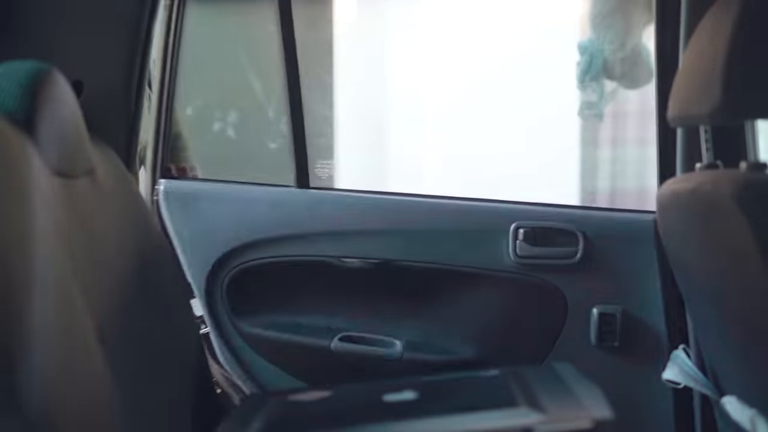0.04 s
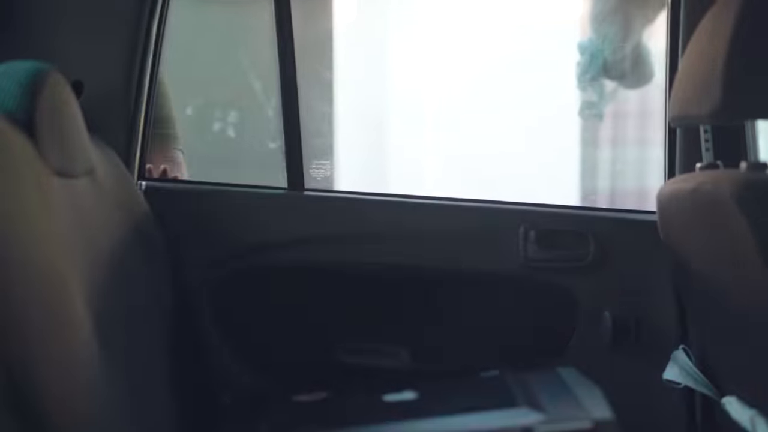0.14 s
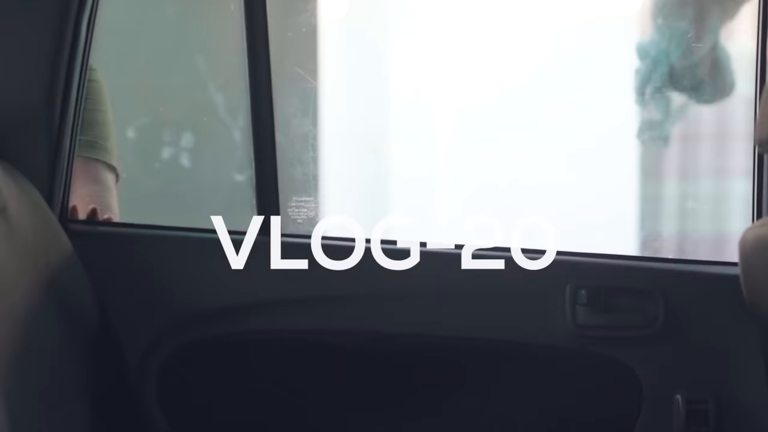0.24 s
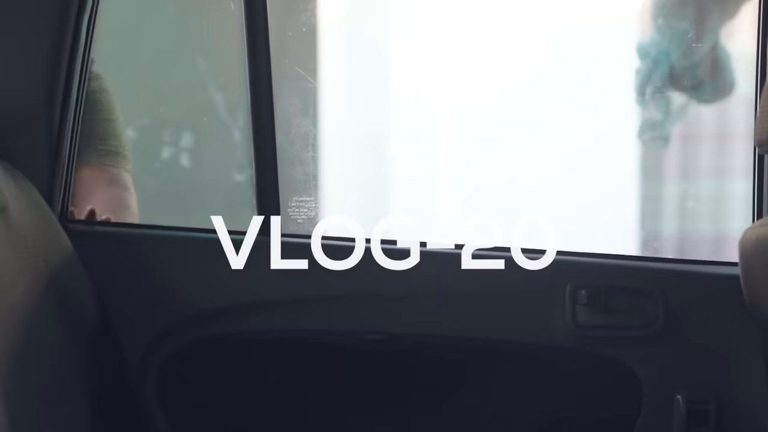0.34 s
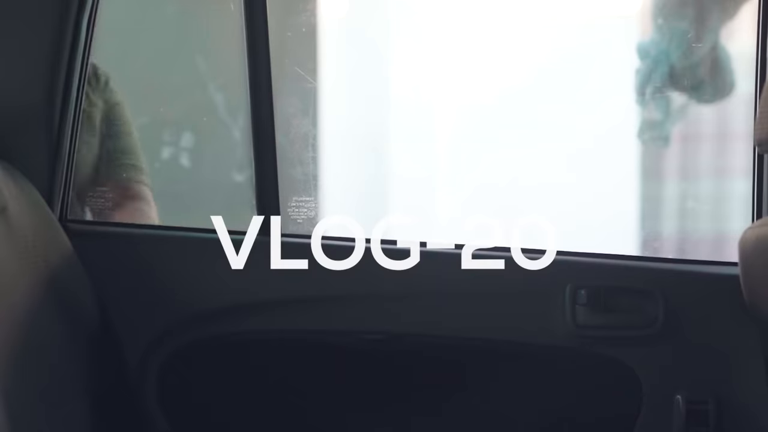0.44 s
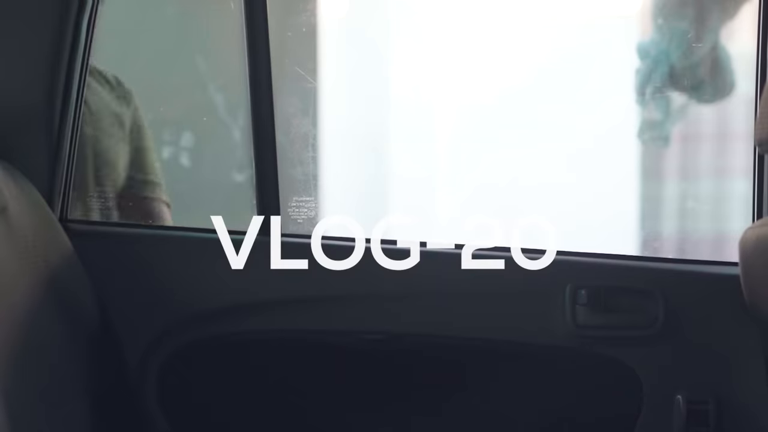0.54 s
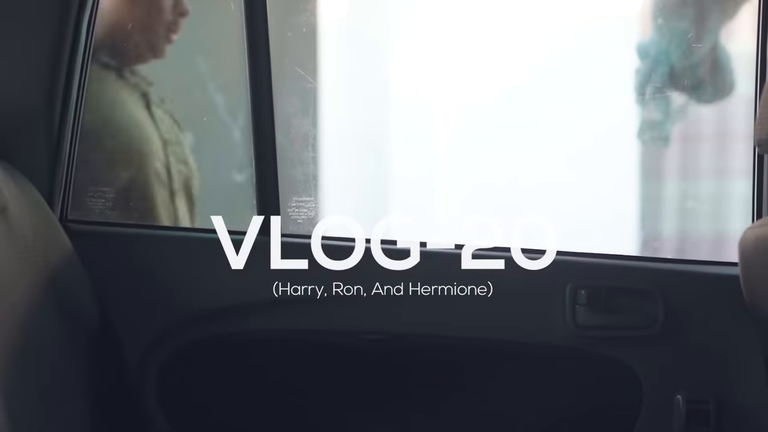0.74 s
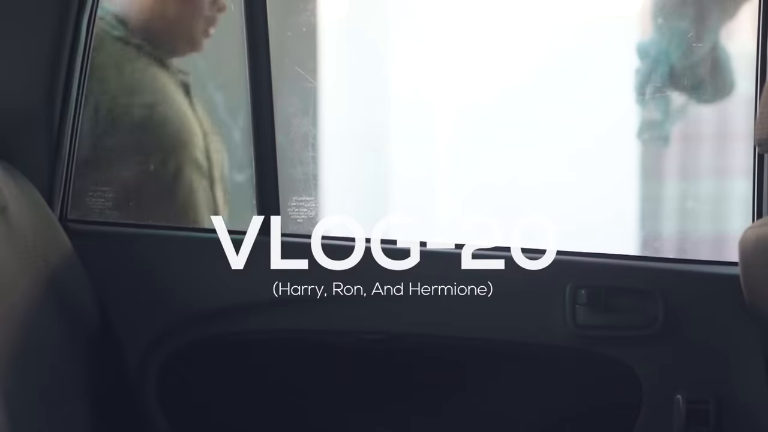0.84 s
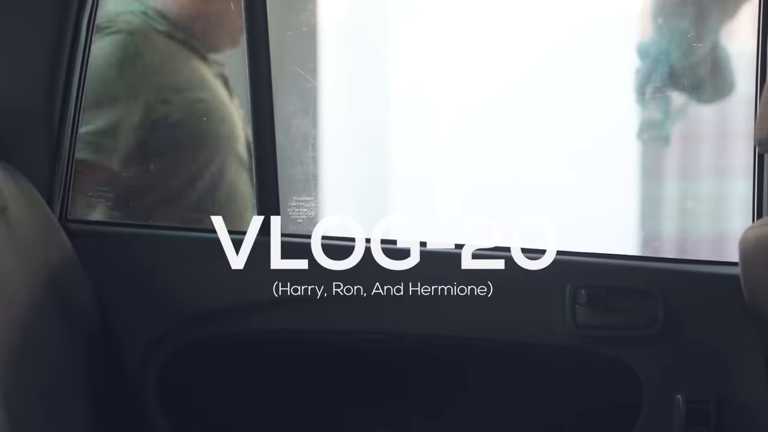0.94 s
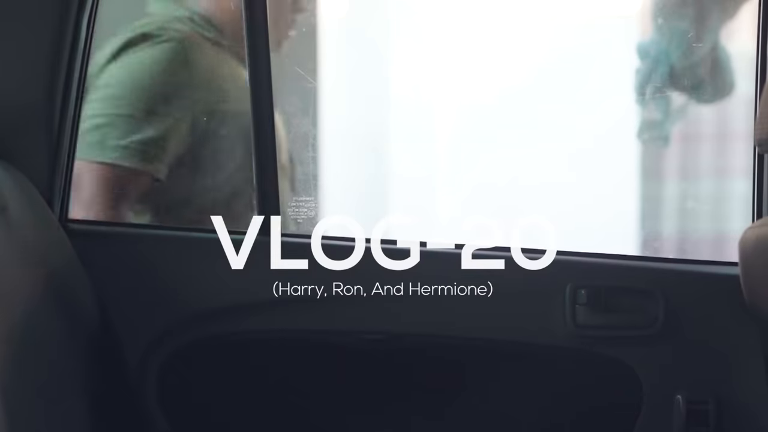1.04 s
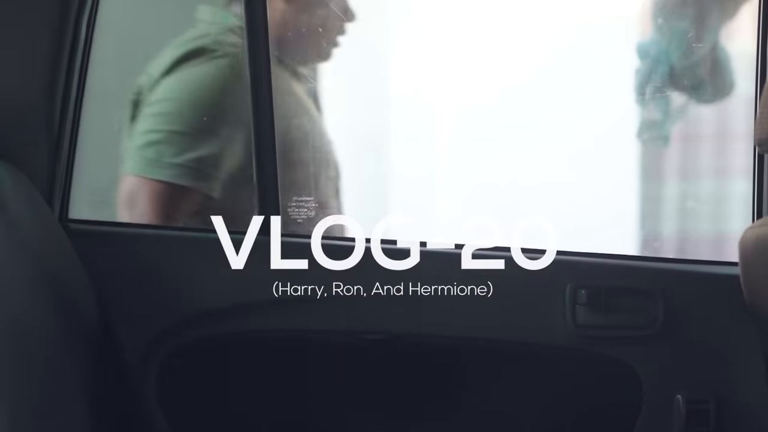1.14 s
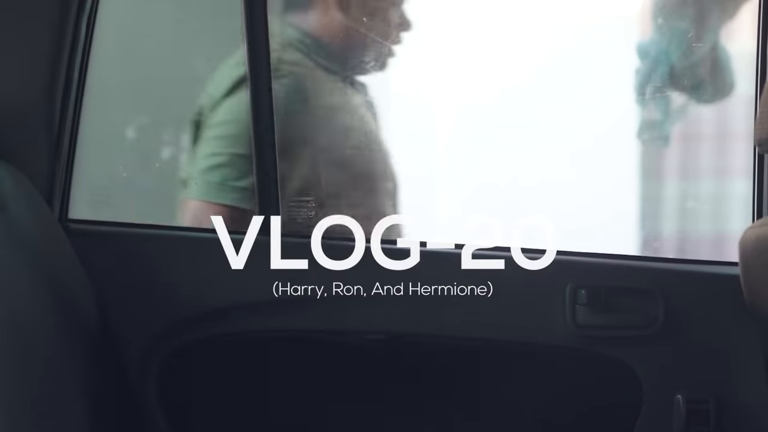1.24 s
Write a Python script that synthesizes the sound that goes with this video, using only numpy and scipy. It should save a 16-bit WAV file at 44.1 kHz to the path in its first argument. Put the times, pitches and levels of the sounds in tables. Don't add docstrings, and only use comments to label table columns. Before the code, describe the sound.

A car door shuts once, close, heard in stereo from inside the cabin: sharp latch click, deep boomy thud, brief trim and glass rattle, then yard echoes over faint traffic and a late bird whistle.

```python
import sys
import numpy as np
from scipy import signal
from scipy.fft import rfft, irfft
from scipy.io import wavfile
from scipy.ndimage import uniform_filter1d

SR = 44100
rng = np.random.default_rng(int(sys.argv[2]) if len(sys.argv) > 2 else 0)


def volts(x):
    e = np.asarray(x, float) / 20
    return 10 ** e


def waveform_to_disk(signal):
    frames = np.transpose(np.atleast_2d(signal))
    scaled = np.clip(frames, -1, 1) * 32767
    samples = np.round(scaled).astype(np.int16)
    wavfile.write(sys.argv[1], SR, samples)


N = 57330

# start in seconds, latch ring in dB, ping in Hz, ping in dB.
CONTACTS = [
    (.2305, -21, 8000, -27),
    (.2345, -8.5, 3670, -16.5),
    (.2487, -12.5, 870, -14),
    (.2515, -18, 7400, -19),
    (.257, -19, 7000, -37),
    (.265, -15, 1170, -19),
    (.2765, -34, 4170, -17),
    (.292, -40, 3540, -23),
    (.302, -15, 3985, -22),
]


def evened(x):
    return x / np.sqrt(np.mean(x ** 2) + 1e-20)


def read(points, hz):
    f, value = np.transpose(points)
    return np.interp(np.log(hz + 1), np.log(f + 1), value)


def add(mix, s, sound):
    part = mix[round(s * SR):][:len(sound)]
    part += sound[:len(part)]


def ring(modes):
    t = np.arange(SR // 2) / SR
    hz, db, t60 = np.transpose(modes)[:, :, None]
    phase = np.pi * np.arange(len(modes))[:, None]
    return volts(db - 60 * t / t60) * np.sin(2 * np.pi * hz * t + phase)


def paired(a, b):
    # frequency in Hz, left-right likeness from 0 to 1.
    likeness = [(50, 1), (125, 1), (250, 0.97), (600, 0.57), (1500, 0.76), (4000, 0.075), (15000, 0.0091)]
    same = np.clip(read(likeness, np.fft.rfftfreq(N, 1 / SR)), 0, 1)
    mid = np.sqrt((1 + same) / 2) * rfft(a, N)
    side = np.sqrt((1 - same) / 2) * rfft(b, N)
    return irfft([mid + side, mid - side], N)


def coloured(x, spectrum):
    return irfft(rfft(x, N) * volts(read(spectrum, np.fft.rfftfreq(N, 1 / SR))), N)


def narrow(hz, wide_hz):
    f = np.fft.rfftfreq(N, 1 / SR)
    resonance = 1 + (2 * (f - hz) / wide_hz) ** 2
    return evened(irfft(rfft(rng.standard_normal((2, N))) / resonance, N))


def street():
    # frequency in Hz, level in dB per Hz.
    traffic = [(25, -3), (60, -6), (130, 4), (300, -9), (1000, -13), (1500, -17), (6700, -32.5),
               (16000, -34)]
    # frequency in Hz, change in dB.
    door_loss = [(40, 3.5), (150, -5.5), (700, -3.5), (3000, -3), (12000, -5)]
    # pitch in Hz, level in dB, end in seconds.
    trill = [
        (5700, -55.5, 0.097),
        (6680, -55, 0.095),
    ]
    hum_db, tyres_db, shut_s = -42, -47.5, .24
    t = np.arange(N) / SR
    hum = volts(hum_db) * evened(coloured(paired(*rng.standard_normal((2, N))), traffic))
    hum = hum + volts(tyres_db) * paired(*narrow(hz=715, wide_hz=186))
    hum = np.where(t < shut_s, hum, coloured(hum, door_loss))
    for hz, db, end in trill:
        hum = hum + volts(db) * narrow(hz, 350) / (1 + np.exp((t - end) / 0.052))
    return hum


def latch():
    # frequency in Hz, level in dB, 60 dB decay in seconds.
    latch_modes = [(855, -20, 0.15), (1098, -3.5, 0.033), (1300, 0, 0.045), (2077, -6, 0.039),
                   (2642, -14, 0.075), (5300, -22, 0.027)]
    ping_t60_s, crack_db, crack_hz = 0.023, -16.5, 5730
    out = np.zeros(N)
    crack = rng.standard_normal((len(CONTACTS), 200)) * np.exp(-np.arange(200) / SR / 0.0021)
    crack = signal.lfilter(*signal.butter(1, crack_hz, fs=SR), crack)
    metal = ring(latch_modes).sum(0)
    for (s, db, ping_hz, ping_db), c in zip(CONTACTS, crack):
        ping = ring([(ping_hz, ping_db, ping_t60_s)])[0]
        add(out, s, volts(db - 5) * metal + ping)
        add(out, s, volts(ping_db + crack_db + 7.5) * c)
    return out


def rattle():
    # time in seconds, level in dB.
    shaking = [(0.231, -49.5), (0.23, -23), (0.247, -18.5), (0.25, -17.5), (0.302, -15), (0.34, -25.5),
               (.36, -21), (.47, -36), (.6, -52)]
    # frequency in Hz, level in dB per Hz.
    rattle_spectrum = [(35, -32), (60, -14.5), (256, -4.5), (398, -15), (540, -7), (607, -12.5),
                       (1510, -17), (6900, -32), (16000, -49)]
    knocks_per_s, spread_db = 3000, 2
    size = volts(spread_db * rng.exponential(1, (2, N))) * rng.standard_normal((2, N))
    knocks = size * (rng.random((2, N)) < knocks_per_s / SR)
    knocks += 0.32 * rng.standard_normal((2, N))
    level_db = np.interp(np.arange(N) / SR, *np.transpose(shaking))
    return evened(coloured(paired(*knocks), rattle_spectrum)) * volts(level_db)


def body():
    # start in seconds, level in dB, push length in seconds.
    blows = [
        (.249, -12, 0.0028),
        (.26, -9.5, 0.0032),
        (.277, -5.5, 0.00375),
        (.299, -6.5, 0.00383),
        (.317, -7, 0.0032),
        (.331, -10, 0.00362),
        (.352, -8.5, 0.0038),
        (.376, -16, 0.0041),
        (.395, -13.5, 0.0023),
        (.423, -19, 0.0038),
    ]
    # frequency in Hz, level in dB, 60 dB decay in seconds.
    shell_modes = [(62.8, -6, 0.17), (103.9, -15.5, 0.74), (124.3, -5.5, 0.51), (159.5, 2.5, 0.39),
                   (185.2, -0.5, 0.26), (198.9, -1.5, 0.81), (225.3, -12, 0.32), (252.9, -11, 1),
                   (315.1, 3, 0.24), (371, 4.5, 0.232), (425.7, 7, 0.18), (457, -28, .2), (550, -22, 0.18)]
    skew_db = 2.0
    push = np.zeros(N)
    for s, db, length in blows:
        shape = np.sin(np.pi * np.arange(0, length, 1 / SR) / length) ** 2
        add(push, s, volts(db - 9.5) * shape / shape.sum())
    skew = volts(skew_db * np.outer([-1, 1], rng.standard_normal(len(shell_modes))))
    return signal.fftconvolve(push[None], skew @ ring(shell_modes), axes=1)[:, :N]


def puff():
    start_s, level_db, fade_s, low_hz = .249, -31, .018, 7000
    t = np.arange(N) / SR - start_s
    hiss = signal.lfilter(*signal.butter(2, low_hz, "high", fs=SR), rng.standard_normal((2, N)))
    return volts(level_db) * hiss * np.clip(t / 0.0031, 0, 1) * np.exp(-abs(t) / fade_s)


def cabin_air():
    # middle in seconds, level in dB, length in seconds.
    squeezes = [
        (0.278, -18.5, 0.023),
        (0.319, -19, 0.025),
        (0.43, -26, 0.042),
        (0.52, -27.5, 0.024),
        (0.648, -35.5, 0.027),
        (0.769, -44.5, 0.026),
    ]
    t = np.arange(N) / SR
    out = np.zeros(N)
    for s, db, length in squeezes:
        turns = (t - s) / length
        out += volts(db) * np.exp(-(3 * turns) ** 2) * np.sin(2 * np.pi * turns) * -2
    return out


def yard(x):
    # frequency in Hz, 60 dB decay in seconds.
    decay = [(40, 1.41), (200, 1.21), (700, 0.77), (2000, 0.92), (6000, 0.96), (14000, 1.16)]
    fill_s = 0.0098
    taps = np.zeros((2, N))
    at = np.arange(300, N - 20, 20) + rng.integers(0, 20, (2, (N - 301) // 20))
    np.put_along_axis(taps, at, rng.choice([-1., 1.], at.shape), 1)
    hz, t, z = signal.stft(paired(*taps), SR, nperseg=256)
    dying = z * volts(-60 * t / read(decay, hz)[:, None])
    tail = signal.istft(dying, SR, nperseg=256)[1][:, :N]
    tail = tail * (1 - np.exp(-np.arange(N) / SR / fill_s))
    return signal.fftconvolve(x[None], tail / np.linalg.norm(tail[0]), axes=1)[:, :N]


def walls(x):
    # delay in seconds, level in dB, smear in seconds.
    echoes = [
        (.11, -5, .01),
        (.168, -9, .01),
        (.27, -15, .01),
        (.398, -20, .01),
        (.562, -24, .004),
    ]
    echoed_s = .045
    t = np.arange(N) / SR
    clumps = np.zeros(N)
    for s, db, smear in echoes:
        clumps += volts(db) * (t > s) * np.exp(-abs(t - s) / smear) / np.sqrt(smear * SR / 2)
    start = x * np.exp(-np.maximum(t - CONTACTS[0][0], 0) / echoed_s)
    reflections = clumps * paired(*rng.standard_normal((2, N)))
    return signal.fftconvolve(start[None], reflections, axes=1)[:, :N]


def bird():
    # start in seconds, length in seconds, from Hz, to Hz, level in dB.
    whistles = [
        (1.073, 0.14, 2897, 3250, -42),
        (1.123, 0.11, 3745, 3818, -37),
        (1.23, 0.038, 6600, 4220, -35),
        (1.256, 0.043, 5910, 3800, -33),
        (1.272, .04, 5700, 4700, -54),
    ]
    glide_s, rise_s, fall_s = .017, .005, .012
    wobble_depth, flutter_depth = .016, .35
    second_db, third_db = -30, -33
    out = np.zeros(N)
    slow = uniform_filter1d(uniform_filter1d(rng.standard_normal((2, N)), 120), 120)
    flutter, wobble = evened(slow)
    for s, length, from_hz, to_hz, db in whistles:
        first = round(s * SR)
        t = np.arange(0, length, 1 / SR)[:N - first]
        hz = to_hz + (from_hz - to_hz) * np.exp(-t / glide_s)
        hz = hz * (1 + wobble_depth * wobble[first:][:len(t)])
        turn = 2 * np.pi * np.cumsum(hz) / SR
        tone = np.sin(turn) + volts(second_db) * np.sin(2 * turn) + volts(third_db) * np.sin(3 * turn)
        breath = np.clip(np.minimum(t / rise_s, (length - t) / fall_s), 0, 1)
        add(out, s, volts(db - 2) * breath * tone)
    return out * (1 + flutter_depth * flutter)


def scene():
    shake, shell, song = rattle() + puff(), body(), bird()
    bright = latch() + shake
    bird_sides = volts(np.array([[1.5], [-1.5]]))
    far_bird = song * bird_sides + volts(-1) * yard(song)
    tail = yard(volts(-4) * bright[0] + volts(-8) * shell[0])
    tail = tail + walls(coloured(shake[1], [(300, -8), (1500, 4)]))
    return bright + shell + cabin_air() + tail + far_bird + street()


def top_cut(x):
    return signal.sosfilt(signal.butter(12, 16220, fs=SR, output="sos"), x)


def record(dry):
    right_lag, low_cut_hz, ceiling, edge_hz = 4, 9.5, 1.1, 16150
    pair = [dry[0], np.roll(dry[1], right_lag)]
    cut = signal.lfilter(*signal.butter(2, low_cut_hz, "high", fs=SR), pair)
    held = cut / (1 + (cut / ceiling) ** 4) ** .25
    low_pass = signal.firwin(511, edge_hz, window=("kaiser", 9), fs=SR)
    mix = signal.oaconvolve(held, low_pass[None], "same")
    return top_cut(mix)


dry = scene()
out = record(dry)
waveform_to_disk(out)
```